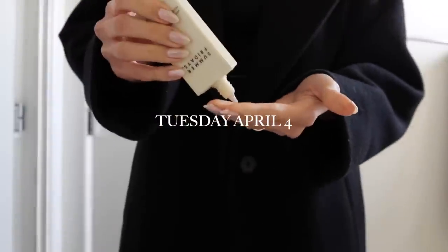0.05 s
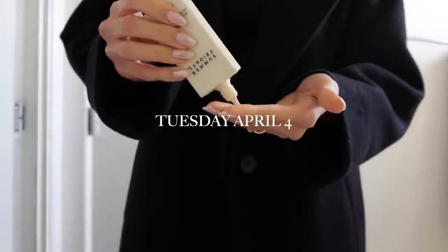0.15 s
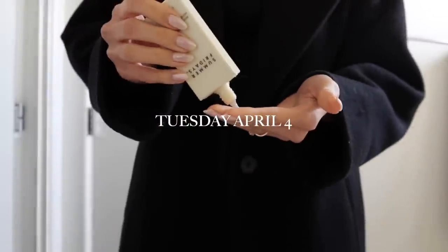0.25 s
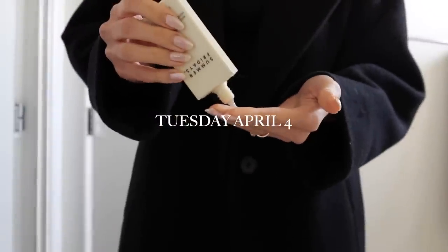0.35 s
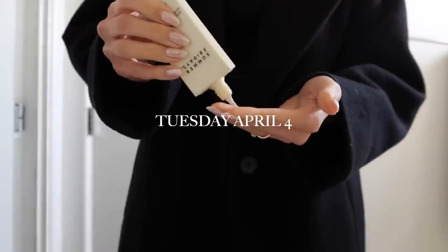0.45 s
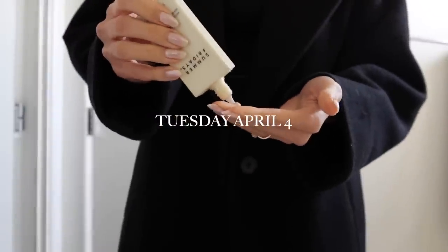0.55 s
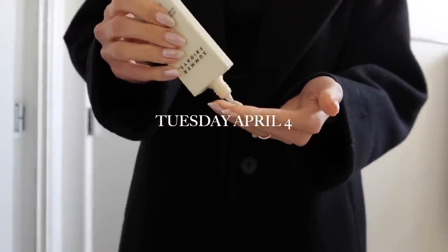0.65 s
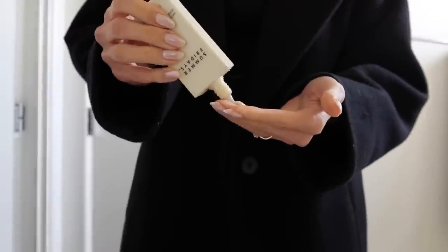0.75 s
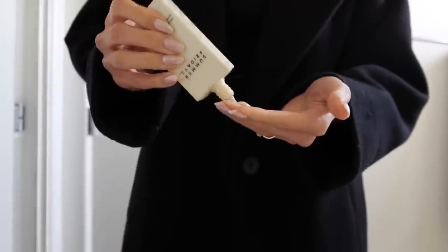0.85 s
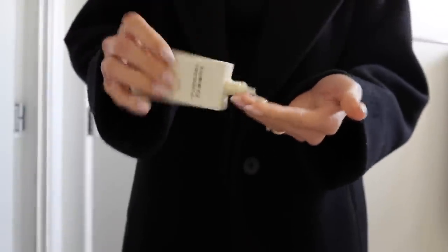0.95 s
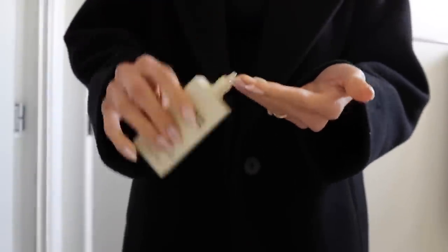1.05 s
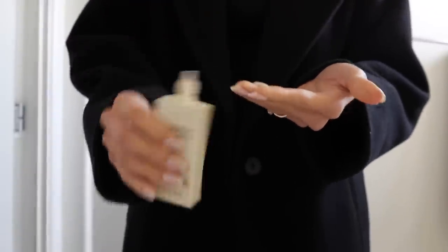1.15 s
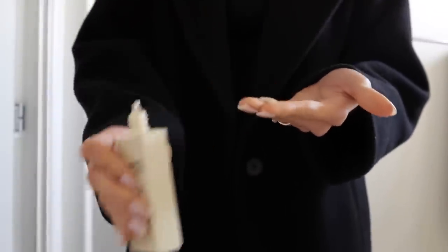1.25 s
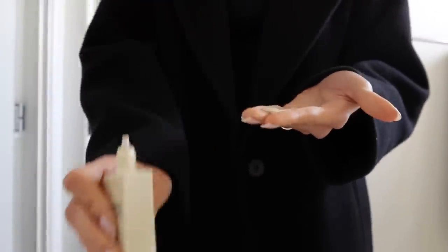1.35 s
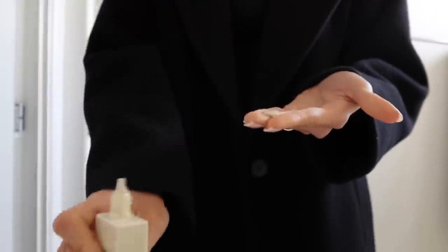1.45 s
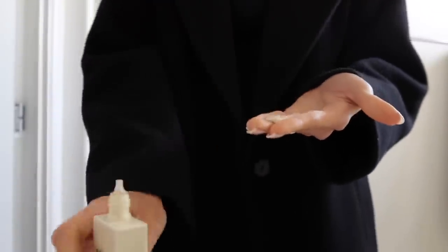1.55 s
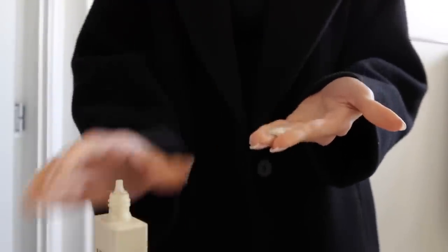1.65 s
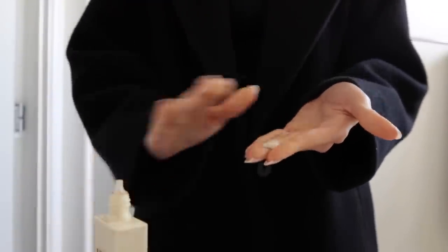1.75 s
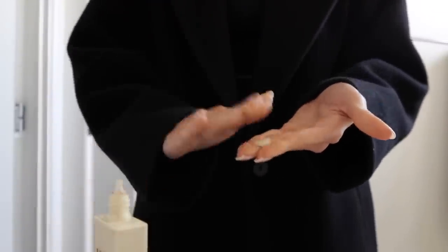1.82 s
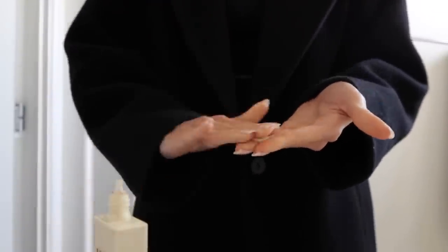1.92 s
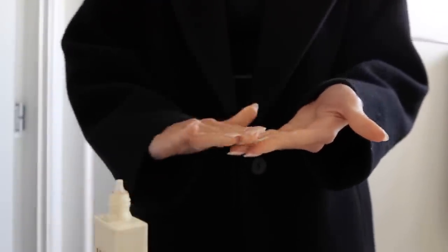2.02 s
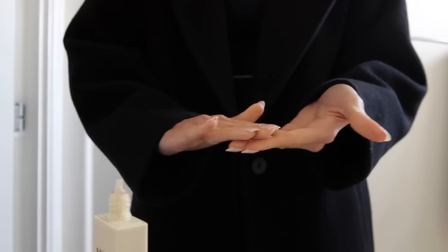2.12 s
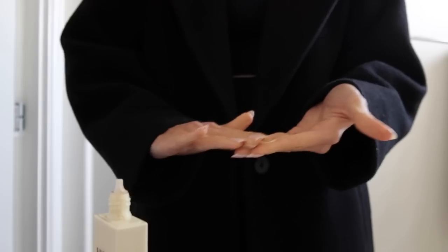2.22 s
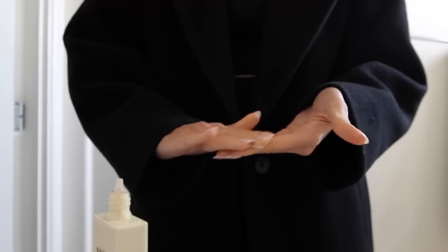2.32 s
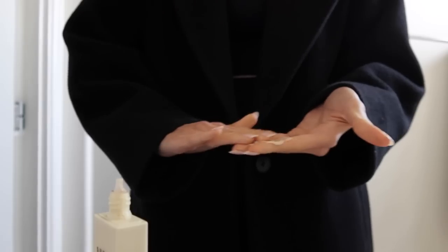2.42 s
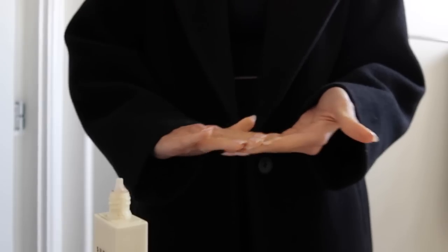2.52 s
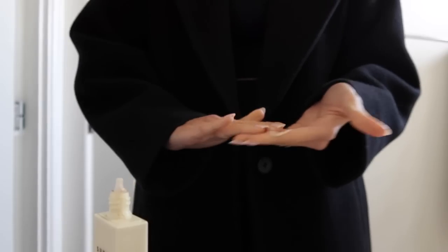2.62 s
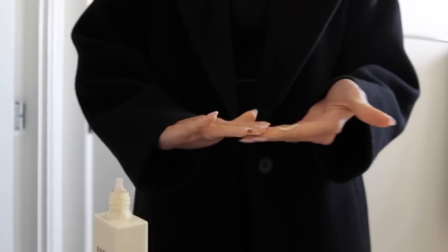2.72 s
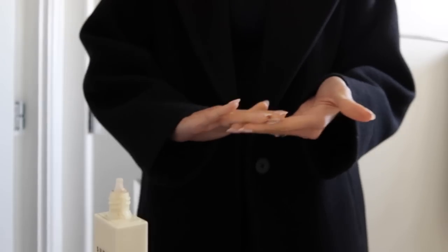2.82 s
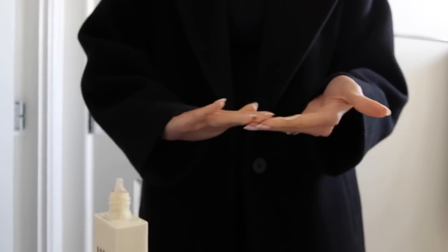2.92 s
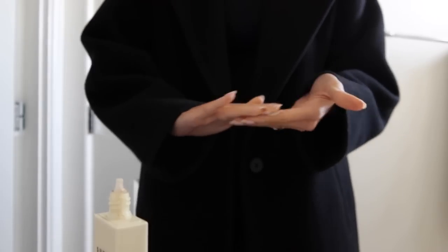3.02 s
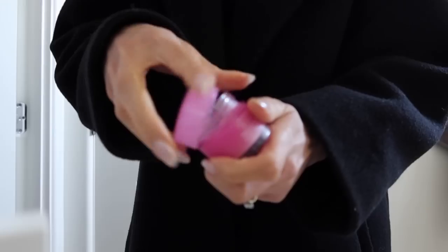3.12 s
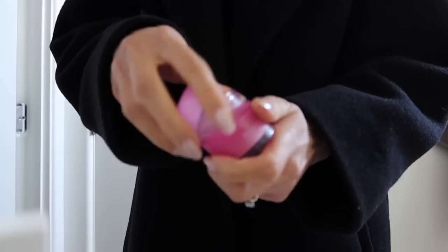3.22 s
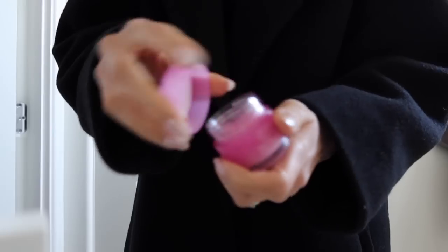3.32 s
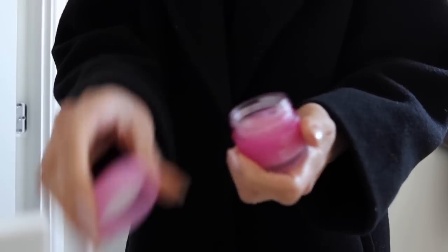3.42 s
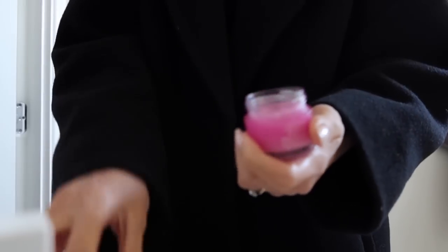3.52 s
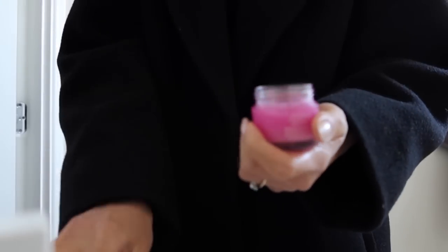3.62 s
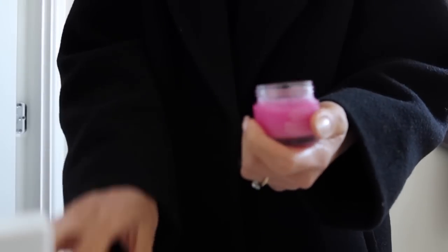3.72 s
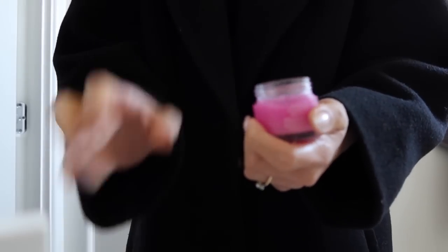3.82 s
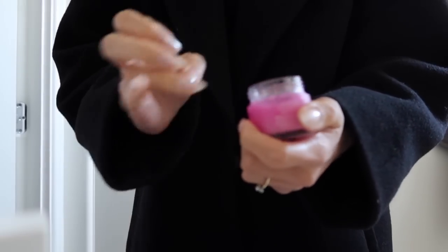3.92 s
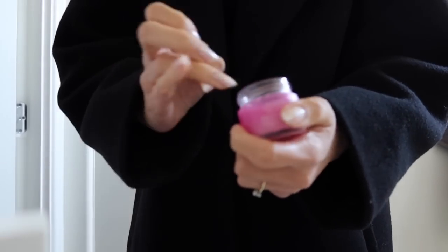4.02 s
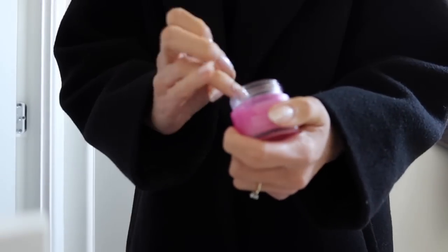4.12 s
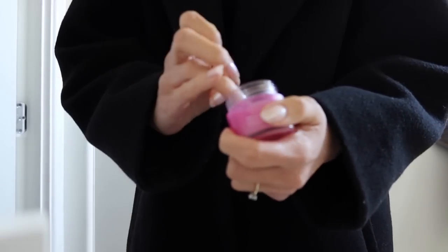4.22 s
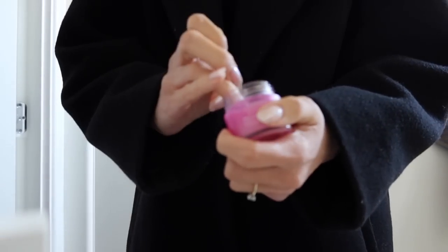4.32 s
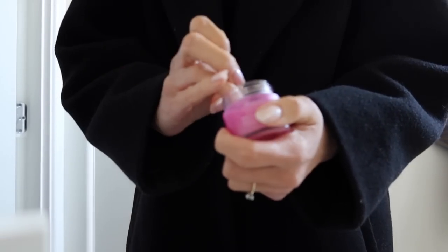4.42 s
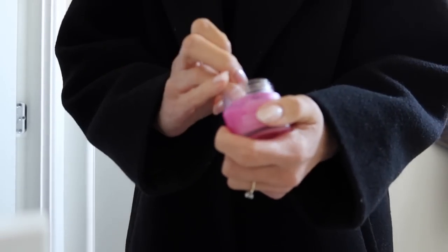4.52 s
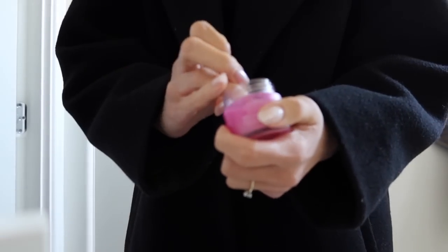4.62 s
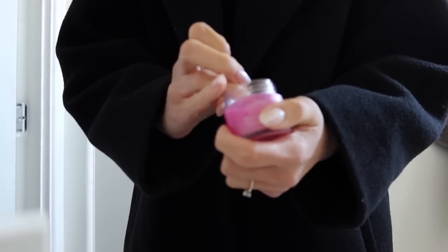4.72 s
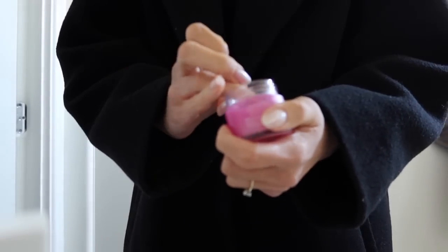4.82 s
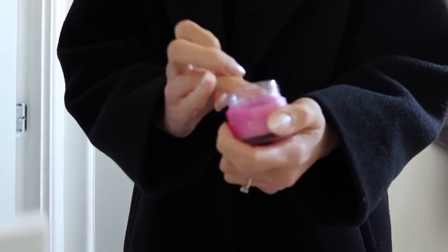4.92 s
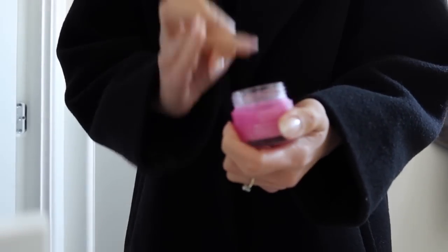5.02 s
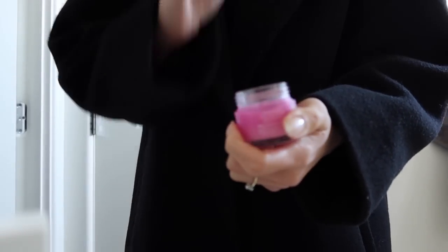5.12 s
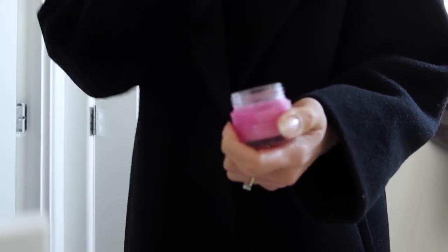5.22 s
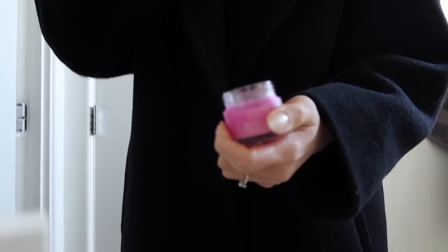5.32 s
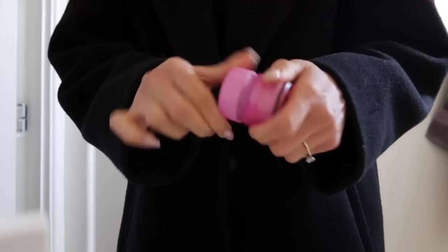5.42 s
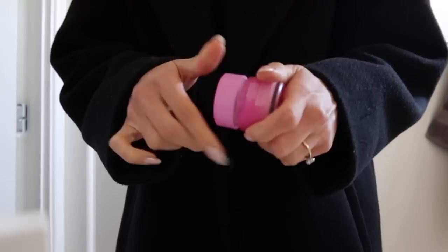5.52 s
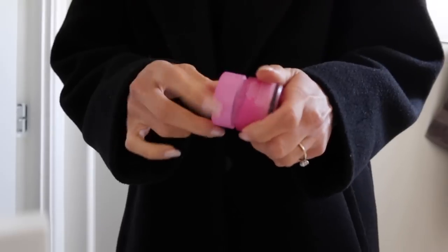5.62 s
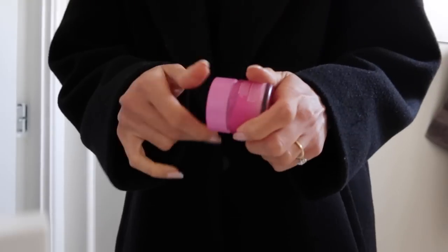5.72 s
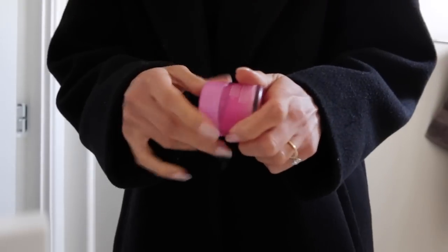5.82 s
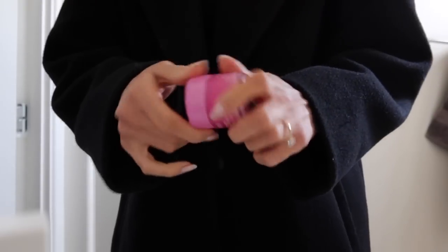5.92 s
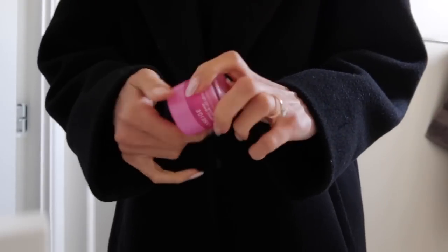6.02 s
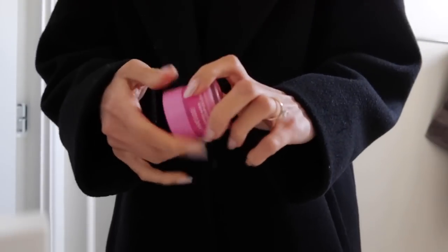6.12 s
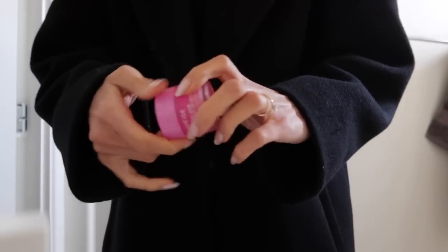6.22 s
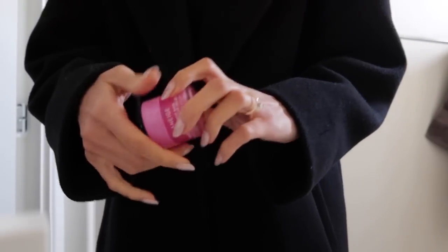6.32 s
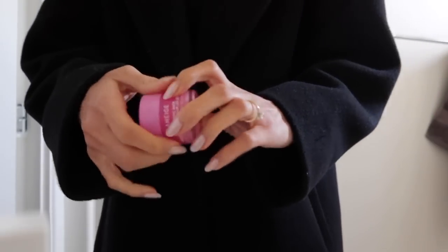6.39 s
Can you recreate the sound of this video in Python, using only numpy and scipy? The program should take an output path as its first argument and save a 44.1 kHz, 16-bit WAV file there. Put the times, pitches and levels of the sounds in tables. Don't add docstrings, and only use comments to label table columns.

```python
import sys
import numpy as np
from scipy import signal
from scipy.fft import rfft, irfft, next_fast_len
from scipy.io import wavfile
from scipy.ndimage import uniform_filter1d

SR = 44100
rng = np.random.default_rng(int(sys.argv[2]) if len(sys.argv) > 2 else 0)


def wav_record(signal):
    frames = np.transpose(np.atleast_2d(signal))
    bounded = np.clip(frames, -1, 1)
    quanta = np.round(bounded * 32767).astype(np.int16)
    wavfile.write(sys.argv[1], SR, quanta)


def field_ratio(decibels):
    return 10 ** (np.asarray(decibels, dtype=float) / 20)


N = 284557


def unit(x):
    return x / np.sqrt(np.mean(x ** 2) + 1e-20)


def along(points, hz):
    f, v = np.transpose(points)
    return np.interp(np.log(hz + 1), np.log(f + 1), v)


def curves(rows):
    s, *cols = np.transpose(rows)
    t = np.arange(N) / SR
    on = uniform_filter1d(1. * (t > s[0]) * (t < s[-1]), size=400)
    return [on] + [np.interp(t, s, c) for c in cols]


def swells(rows, rise_db_per_s, fall_db_per_s):
    s, hold, *levels = np.transpose(rows)[..., None]
    t = np.arange(0, N + 64, 64) / SR
    rise_db = -rise_db_per_s * np.clip(s - t, 0, None)
    fall_db = -fall_db_per_s * np.clip(t - s - hold, 0, None)
    gains = [field_ratio(db + rise_db + fall_db).max(axis=0) for db in levels]
    return [np.interp(np.arange(N) / SR, t, gain) for gain in gains]


def filtered(x, response):
    m = next_fast_len(N + 8192)
    return irfft(rfft(x, m) * response(np.fft.rfftfreq(m, 1 / SR)), m)[..., :N]


def hump(centre_hz, octaves):
    return lambda hz: np.exp(-(np.log2((hz + 1) / centre_hz) / octaves) ** 2)


def rush(response, alike):
    turn = lambda hz: np.arccos(np.clip(along(alike, hz), -1, 1)) / 2
    split = lambda hz: response(hz) * [np.cos(turn(hz)), np.sin(turn(hz))]
    mid, side = filtered(rng.standard_normal((2, N)), split)
    return unit(np.array([mid + side, mid - side]))


def ring(modes, t, attack_s, scatter_db, detune=0.014):
    luck = rng.standard_normal((len(modes), 2))
    tones = 0
    for (hz, db, t60), (strength, shift) in zip(modes, luck):
        decay = field_ratio(db + scatter_db * strength - 60 * t / t60)
        tones += decay * np.sin(2 * np.pi * hz * (1 + detune * shift) * t)
    return tones * (1 - np.exp(-t / attack_s))


# (frequency [Hz], t60 [s])
ROOM_T60 = [(150, 0.9), (500, 0.22), (1500, 0.26), (4000, 0.3), (10000, 0.34)]
# (frequency [Hz], level [dB])
WALL_LEVEL = [(100, -4), (500, 3), (3500, -3.5), (6500, 1), (8500, -12), (14000, -19.5)]
# (frequency [Hz], side share [0-1])
TAIL_SPREAD = [(100, 0.04), (400, 0.28), (1500, 0.12), (3000, 0.26), (6000, 0.366)]


def room(x, wet_db):
    hz, t, z = signal.stft(rng.standard_normal((2, SR // 3)), SR, nperseg=256)
    z = z * field_ratio(along(WALL_LEVEL, hz)[:, None] - 60 * t / along(ROOM_T60, hz)[:, None])
    side = z[1] * along(TAIL_SPREAD, hz)[:, None]
    a, b = signal.istft([z[0], side], SR, nperseg=256)[1]
    build_up = np.clip(np.arange(len(a)) / SR / 0.0051, 0, 1) ** 2
    tail = np.array([a + b, a - b]) * build_up
    wet = signal.fftconvolve(x[None], field_ratio(wet_db - 2.5) * tail / np.linalg.norm(tail[0]), axes=1)
    lead = 0.46 * np.gradient(x)
    return wet + np.pad([x + lead, x - lead], ((0, 0), (0, wet.shape[1] - len(x))))


def add(out, s, x):
    part = out[:, round(s * SR):][:, :x.shape[1]]
    part += x[:, :part.shape[1]]


# (frequency [Hz], density [dB per Hz])
AIR_SPECTRUM = [(18, -32), (42, -19), (60, -10), (100, -14), (160, -16), (300, -17), (550, -20), (800, -20),
                (1300, -23), (2000, -26.5), (4000, -32), (8200, -41), (13000, -50), (16000, -55)]
# (frequency [Hz], correlation [-1 to 1])
AIR_ALIKE = [(30, .96), (70, .88), (130, .7), (290, -.1), (640, -.2), (1400, 0), (3100, .25), (6800, .43),
             (15000, .45)]
# (frequency [Hz], level [dB rms], width [Hz])
HUM_LINES = [(120.8, -52, 3.5), (286.7, -66.5, 6.24), (369, -73, 2.4)]


def room_tone():
    air = field_ratio(-50) * rush(lambda f: field_ratio(along(AIR_SPECTRUM, f)), AIR_ALIKE)
    t = np.arange(N) / SR
    knots = np.arange(0, t[-1] + .02, .01)
    for hz, db, width_hz in HUM_LINES:
        sway = uniform_filter1d(rng.standard_normal((2, len(knots))), size=5)
        for _ in range(2):
            sway = signal.lfilter([1], [1, -np.exp(-width_hz / 16)], sway)
        size, phase = [np.interp(t, knots, unit(s)) for s in sway]
        air += field_ratio(db) * unit((1 + 0.064 * size) * np.sin(2 * np.pi * hz * t + 0.29 * phase))
    return air


# (time [s], hold [s], level [dB])
CLOTH_BUMPS = [(.04, 0.5, -62.5), (.914, .01, -53.5), (1.07, 0.36, -55.5), (1.66, 0.0091, -59),
               (1.79, 0.0067, -53.5), (2.69, .01, -62), (2.776, 0.024, -50.5), (2.97, .02, -57),
               (4.256, .01, -65), (4.388, 0.0076, -55.5), (4.9, 0.047, -59.5), (5.11, 0.23, -55)]
# (time [s], hold [s], rub [dB], fine fibres [dB])
CLOTH_RUBS = [
    (.984, .01, -60, -65.5),
    (1.088, .02, -62, -73),
    (1.282, 0.22, -55.5, -73),
    (1.68, 0.19, -57, -73),
    (2.776, .01, -59, -72),
    (2.914, 0.0088, -54, -90),
    (4.3, 0.032, -74, -85),
    (5.11, 0.12, -63, -73),
    (5.3, 0.1, -56, -68),
]
# (time [s], hold [s], low bumps [dB])
GRIP_SHIFTS = [
    (3.756, 0.0063, -44.5),
    (5.38, 0.34, -53.5),
    (5.678, 0.031, -43.5),
    (5.876, 0.083, -41.5),
    (6.178, 0.056, -40.5),
    (6.36, 0.075, -50.5),
]


def cloth():
    shapes = (300.4, 1.0), (2200, 0.92), (11860, 0.55), (222, 0.82)  # Hz, octaves
    bands = [rush(hump(hz, octaves), [(1000, 0.82)]) for hz, octaves in shapes]
    gains = swells(CLOTH_BUMPS, rise_db_per_s=210, fall_db_per_s=140)
    gains += swells(CLOTH_RUBS, rise_db_per_s=115, fall_db_per_s=100)
    gains += swells(GRIP_SHIFTS, rise_db_per_s=640, fall_db_per_s=220)
    rests = [field_ratio(-67), field_ratio(-86), field_ratio(-92.5), 0]
    return sum(np.maximum(gain, rest) * band for gain, rest, band in zip(gains, rests, bands))


# (time [s], peak [dB])
BOTTLE_LANDING = [
    (1.5, -4.5),
]
# (frequency [Hz], level [dB], t60 [s])
BOTTLE_MODES = [(451, 4.5, 0.021), (521, 5, 0.016), (609, 1.5, 0.02), (980, -21.5, 0.039),
                (1300, 1, 0.0083), (1750, -9.5, 0.012)]
# (frequency [Hz], level [dB], t60 [s])
COUNTER_MODES = [(117.4, 3, 0.31), (107.4, -4, 0.26), (70.6, -14, 0.36), (192, -19.5, 0.49),
                 (255, -25, .25), (294, -10, 0.7), (375, -27, 0.45), (426, -26, 0.35), (490, -23, .15),
                 (676, -31, 0.16), (730, -28, .12)]


def bottle():
    hand_damp_db_per_s2 = 380
    out, t = np.zeros((2, N)), np.arange(SR * 2 // 3) / SR
    for s, db in BOTTLE_LANDING:
        thump = field_ratio(3.0) * ring(BOTTLE_MODES, t, 0.0025, 0, detune=0)
        grit = uniform_filter1d(rng.standard_normal(len(t)), size=7) * field_ratio(-60 * t / 0.012)
        thump += field_ratio(-21.5) * grit
        boom = field_ratio(-9.5) * ring(COUNTER_MODES, t, 0.007, 0, detune=0)
        boom *= field_ratio(-hand_damp_db_per_s2 * t ** 2)
        both = field_ratio([[1.3], [-1.3]]) * room(thump, -11) + room(boom, -18.5)
        add(out, s + 0.00075, -field_ratio(db) * both)
    return out


# (frequency [Hz], level [dB], t60 [s])
LID_MODES = [(1260, -22, 0.019), (1624, -7, 0.019), (2020, -13, 0.021), (2375, 3, 0.017),
             (2564, 0.5, 0.0094), (2840, 3.5, 0.013), (3166, -10, 0.03), (3415, -11, 0.008),
             (3657, -8.5, .009)]
# (frequency [Hz], level [dB], t60 [s])
HOLLOW_MODES = [(432, 2, 0.017), (623, 8, 0.016), (877, -6.5, 0.042)]
# (frequency [Hz], level [dB], t60 [s])
GLASS_MODES = [(4840, -11, 0.0066), (5230, -3, 0.044), (5410, -5, 0.0349), (6080, -1, 0.01)]
# (frequency [Hz], level [dB], t60 [s])
TICK_MODES = [(6640, 11, 0.00068), (8130, 0.5, 0.0023), (11160, -2.5, 0.0051), (12960, 4, 0.0013)]
RATTLE_BAND = signal.butter(7, [2000, 3600], "bandpass", fs=SR, output="sos")
SOFT_TOP = signal.butter(4, 13500, fs=SR, output="sos")


def contacts(rows, t60, glass_db, wet_db, lid_db):
    rattle_db, rattle_t60 = 3, 0.011
    out, t = np.zeros((2, N)), np.arange(SR // 14) / SR
    for s, db, hz, tick_db, hollow_db in rows:
        upper_db = lid_db + 0.18 * (tick_db + 27)
        body = ring([(hz, 0, t60 * field_ratio(0.08 * db))], t, 0.00036, 0, detune=0)
        body += field_ratio(upper_db - 7.5) * ring(LID_MODES, t, 0.00049, 2.8, detune=0.03)
        body += field_ratio(hollow_db + 6) * ring(HOLLOW_MODES, t, 0.0025, 2.4, detune=0.086)
        body += field_ratio(glass_db) * ring(GLASS_MODES, t, 0.00039, 0.87, detune=0.0073)
        buzz = field_ratio(upper_db + rattle_db - 60 * t / rattle_t60) * rng.standard_normal(len(t))
        body += signal.sosfilt(RATTLE_BAND, buzz)
        noise = uniform_filter1d(rng.standard_normal((2, len(t) + 1)), size=3)
        cracks = np.diff(noise) * field_ratio(-60 * t / 0.0041)
        ticks = [ring(TICK_MODES, t, .0001, 1.92, detune=0.088) + .8 * crack for crack in cracks]
        tick, other = [field_ratio(tick_db + 4.5) * signal.sosfilt(SOFT_TOP, x) for x in ticks]
        add(out, s + .0006, field_ratio(db - 2.5) * room(tick - body, wet_db))
        add(out, s + .0006, field_ratio(db - 7.0) * np.array([other, -other]))
    return out


# (time [s], peak [dB], ring [Hz], edge tick [dB], hollow [dB])
NAIL_TAPS = [
    (1.8403, -23.5, 2520, -41, -24),
    (1.841, -27.5, 1750, -48, -23),
]
# (time [s], peak [dB], ring [Hz], edge tick [dB], hollow [dB])
FINGER_KNOCK = [
    (1.842, -27.5, 640, -60, -30),
]


def finger():
    nail = contacts(NAIL_TAPS, 0.013, glass_db=-46, wet_db=-8, lid_db=2.6)
    return nail + contacts(FINGER_KNOCK, .045, glass_db=-56, wet_db=-12, lid_db=-10)


# (time [s], level [dB], air gap resonance [Hz])
OPENING_TWIST = [
    (3.122, -68, 1686),
    (3.18, -58, 1750),
    (3.23, -41.5, 1760),
    (3.265, -55.5, 1760),
    (3.3, -44.5, 1850),
    (3.335, -40.5, 2086),
    (3.36, -52, 2330),
    (3.385, -67, 2380),
]
# (time [s], hold [s], level [dB], air gap resonance [Hz])
CLOSING_TURNS = [
    (5.41, .07, -51, 1826),
    (5.525, 0.0053, -39.5, 2200),
    (5.664, 0.019, -44, 2200),
    (5.746, .01, -44.5, 1403),
    (5.969, 0.091, -45.5, 1447),
]


def threads():
    out = np.zeros(N)
    on, db, opening_hz = curves(OPENING_TWIST)
    turns = np.array(CLOSING_TURNS)
    closing_gain, = swells(turns[:, :3], rise_db_per_s=620, fall_db_per_s=390)
    closing_hz = curves(turns[:, ::3])[1]
    body = lambda f: hump(1600, 1.4)(f) / (1 + (f / 3800) ** 10) + 0.038 * hump(9000, .7)(f)
    for gain, hz, broad_db in ((on * field_ratio(db), opening_hz, -2.5), (closing_gain, closing_hz, 3)):
        slips = (rng.random(N) < 1800 / SR) * rng.uniform(-1, 1, N) ** 3
        slow = filtered(np.array([slips, np.roll(slips, 977)]), lambda f: 1 / (1 + 1j * f / 105))
        phase = 2 * np.pi * np.cumsum(hz) / SR
        gap = unit(slow[0] * np.sin(phase) + slow[1] * np.cos(phase))
        out += gain * (gap + field_ratio(broad_db) * unit(filtered(slips, body)))
    return room(out, -5.5)[:, :N]


# (time [s], peak [dB], edge tick [dB], hollow [dB])
UNCAP_KNOCKS = [
    (3.141, -15.5, -22, -28),
    (3.1728, 5.5, -26, -43),
    (3.187, -27, -32.5, -28),
    (3.2144, -13.5, -44, -19.5),
    (3.275, -19.5, -47, -25.5),
    (3.2896, -24.5, -37, -20),
    (3.3037, -20, -32, -15.5),
    (3.3187, -13.5, -29, -19.5),
    (3.3325, -28.5, -7, -7.5),
    (3.3551, -22.5, -36, -18),
]
# (time [s], peak [dB], ring [Hz], edge tick [dB], hollow [dB])
LAY_KNOCKS = [
    (3.6483, 6, 2283, -23.5, -47),
    (3.6567, -15, 2830, -41, -45),
    (3.7314, -15.5, 1820, -16.5, -19.5),
]
# (time [s], peak [dB], ring [Hz], edge tick [dB], hollow [dB])
SETTLE_KNOCKS = [
    (3.7609, 3.5, 1920, -36.5, -34),
    (3.7727, -4, 1800, -45, -48),
    (3.7833, -9, 1610, -31, -45),
]
# (time [s], peak [dB], ring [Hz], edge tick [dB], hollow [dB])
SCREW_KNOCKS = [(5.3931, -23, 1670, -25.5, -18.5), (5.435, -15, 1680, -75, -26),
                (5.4829, -25, 1920, -22, -15), (5.5079, -16, 1920, -21, -12), (5.5254, -16, 1970, -19, -39),
                (5.5288, -16.5, 2260, -26, -13.5), (5.5354, -15.5, 2240, -18, -21),
                (5.5484, -25.5, 2250, -30, -6), (5.6481, -8.5, 2180, -24, -17.5),
                (5.6784, -16, 1820, -44, -23), (5.6865, -12, 1910, -43, -18.5),
                (5.7409, -15, 1240, -34, -16), (5.7454, -20, 1240, -49, -11),
                (5.8132, -24, 2270, -31, -10.5), (5.883, -4, 1860, -24.5, -20),
                (6.0142, -12, 2050, -30, -34), (6.0174, -15, 2220, -15, -5), (6.0945, -20, 1730, -14, -12)]
# (time [s], peak [dB], ring [Hz], edge tick [dB], hollow [dB])
THREAD_CATCHES = [
    (5.9711, -1.5, 1380, -31.5, -19.5),
    (6.0571, -11, 1840, -37.5, -15),
    (6.1763, -8, 2160, -9, -17),
    (6.1966, -4, 1900, -27, -23),
]
# (time [s], peak [dB], ring [Hz], edge tick [dB], hollow [dB])
REBOUNDS = [
    (3.1236, -9, 1016, -26, -30),
    (3.1262, -17, 2670, -35, -24),
    (3.1335, -33, 2100, -14, -26),
    (3.6425, -29, 2660, -24.5, -23),
    (3.6468, -18.5, 2290, -25, -22),
    (3.7628, 0.5, 1514, -26.5, -33),
    (5.6452, -13.5, 1840, -18, -13),
    (5.8808, -24, 2980, -1.5, -26),
    (6.1738, -23, 1490, -9.5, -29),
    (6.1787, -12, 1300, -12, -9),
]


def jar():
    when, _, gap_hz = np.transpose(OPENING_TWIST)
    uncap = [(s, db, np.interp(s, when, gap_hz), edge, hollow) for s, db, edge, hollow in UNCAP_KNOCKS]
    skip_s, skip_db, skip_pitch = .0098, -13, 0.84
    skips = [(s + skip_s, db + skip_db, hz * skip_pitch, edge, hollow)
             for s, db, hz, edge, hollow in THREAD_CATCHES]
    out = contacts(uncap, 0.017, glass_db=-32.5, wet_db=-13, lid_db=-5)
    out += contacts(LAY_KNOCKS, 0.018, glass_db=-45.5, wet_db=-8, lid_db=0)
    out += contacts(SETTLE_KNOCKS, 0.014, glass_db=-21.5, wet_db=-8.5, lid_db=-5.5)
    out += contacts(SCREW_KNOCKS, 0.012, glass_db=-45, wet_db=-9.5, lid_db=-3.5)
    out += contacts(THREAD_CATCHES + skips, 0.0091, glass_db=-46, wet_db=-9, lid_db=-3)
    return out + contacts(REBOUNDS, 0.011, glass_db=-42, wet_db=-3, lid_db=-4)


def scene():
    return room_tone() + cloth() + bottle() + finger() + threads() + jar()


def band_limit(x):
    return signal.sosfilt(signal.butter(12, 16450, fs=SR, output="sos"), x)


def record(dry):
    x = filtered(dry, lambda hz: 1j * hz / (42 + 1j * hz) / np.sqrt(1 + (hz / 15000) ** 16))
    x = x / (1 + np.abs(x / 1.02) ** 12) ** (1 / 12)
    return band_limit(x)


dry = scene()
out = record(dry)
wav_record(out)
```